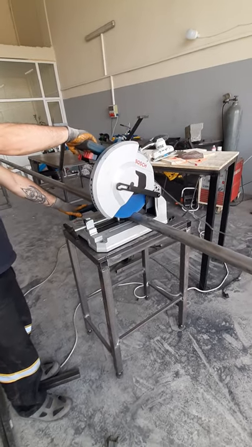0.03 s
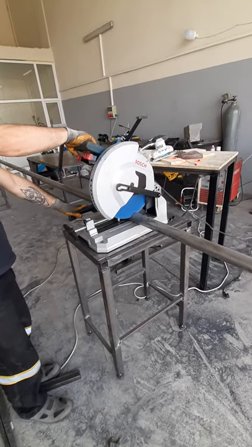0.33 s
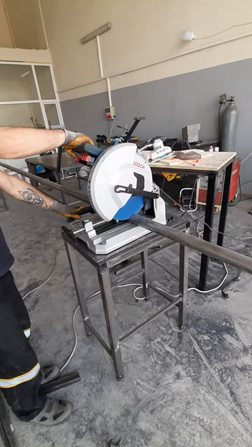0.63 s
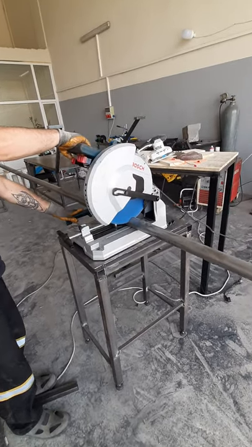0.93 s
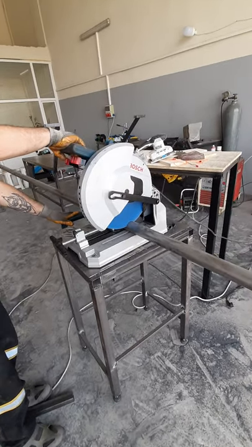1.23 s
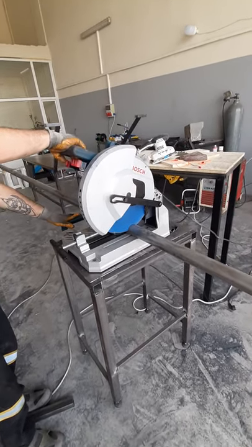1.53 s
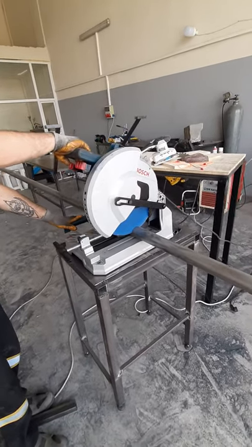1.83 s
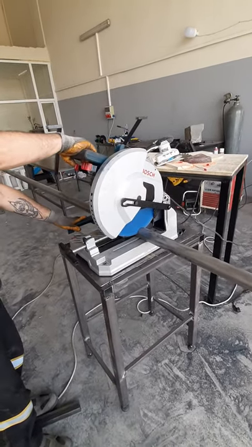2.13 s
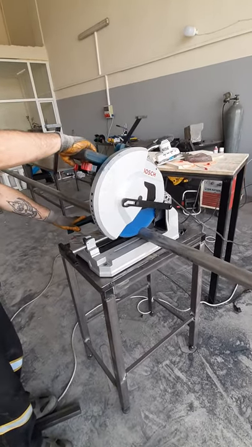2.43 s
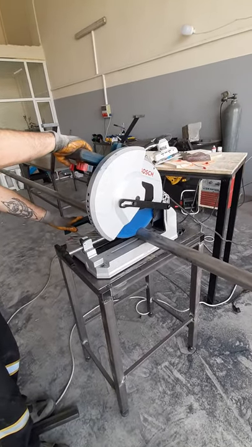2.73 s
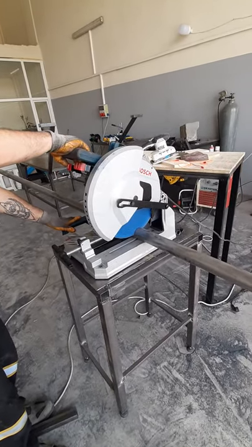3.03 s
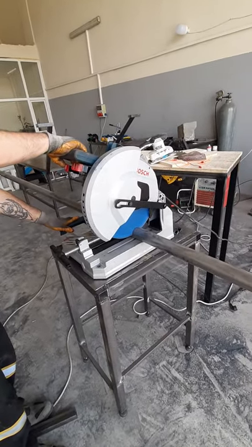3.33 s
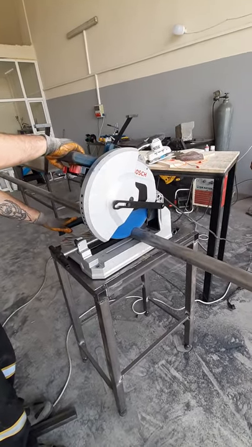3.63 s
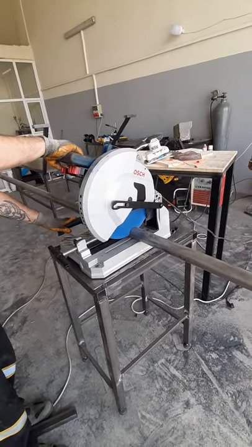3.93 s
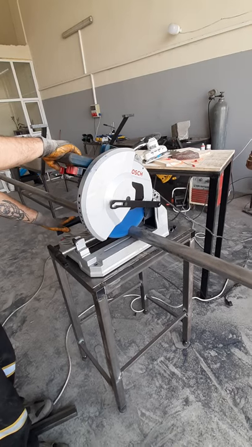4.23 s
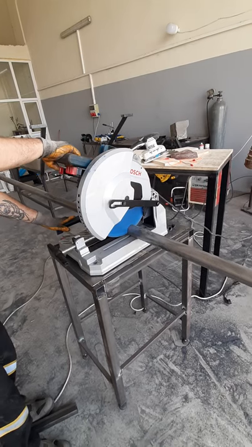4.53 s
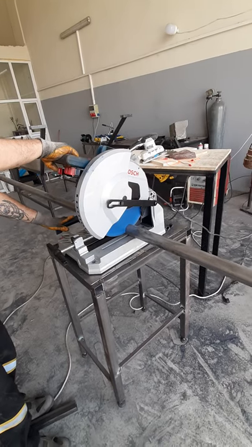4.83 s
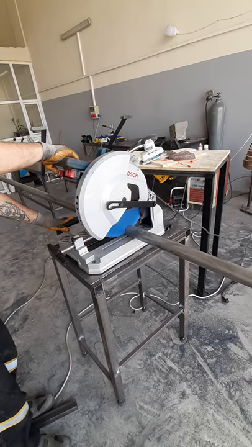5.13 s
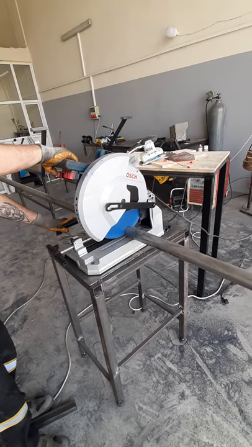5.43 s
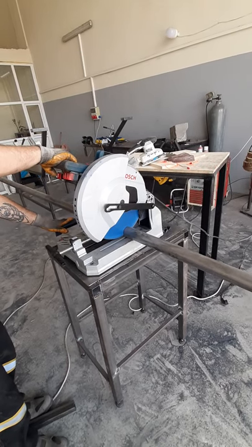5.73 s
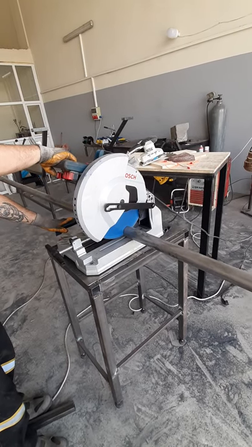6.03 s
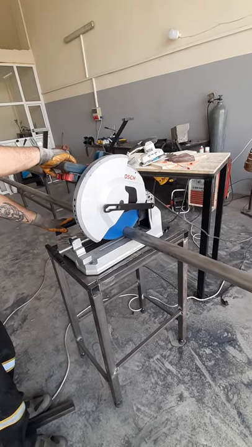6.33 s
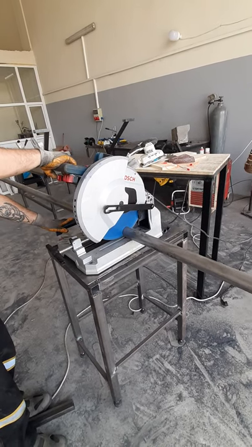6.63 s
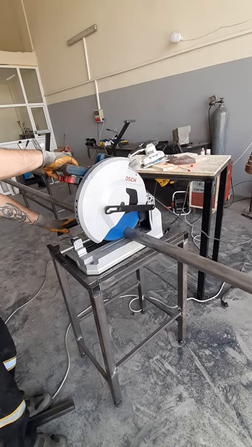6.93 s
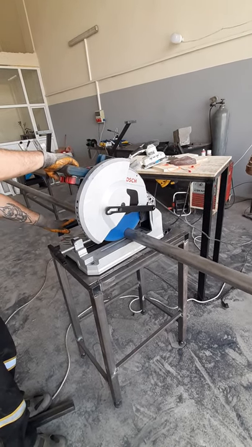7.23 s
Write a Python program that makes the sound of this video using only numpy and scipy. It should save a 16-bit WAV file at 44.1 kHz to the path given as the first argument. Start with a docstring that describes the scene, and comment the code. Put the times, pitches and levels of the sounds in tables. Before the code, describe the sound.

Close by in a workshop, a chop saw works through a steel pipe in seven pushes, a second or two apart. Each brings a harsh rasp, high shrieks and a spatter of chips ticking against the left side of the microphone. The motor sags a little under load and recovers as the pipe rings on. Air rushes from the motor throughout, and the last push is only just beginning at the end.

```python
"""A chop saw is already biting into a steel pipe in a hard-walled workshop, its cooling air roaring.
The push slows the motor; the 60 teeth whine, squeal and shriek, scrape the steel and set the pipe ringing.
Chips pelt the left microphone of a phone close by; the right one faces away and hears less treble.
Then the hand eases off, the blade speeds up and only brushes the pipe. Six more pushes follow, about
one to two seconds apart, and the last has only just begun when the sound ends."""
import sys
import numpy as np
from scipy import signal
from scipy.fft import rfft, irfft, next_fast_len
from scipy.io import wavfile

SR = 44100
rng = np.random.default_rng(int(sys.argv[2]) if len(sys.argv) > 2 else 0)


def waveform_to_disk(signal):
    """Save audio, clipped to [-1, 1], as 16-bit WAV at the path in sys.argv[1]."""
    frames = np.transpose(np.atleast_2d(signal))
    scaled = np.clip(frames, -1, 1) * 32767
    samples = np.round(scaled).astype(np.int16)
    wavfile.write(sys.argv[1], SR, samples)


N = 320607
T = np.arange(N) / SR
SIZE = next_fast_len(N + SR)  # a spare second leaves room for echoes
HZ = np.maximum(np.arange(SIZE // 2 + 1) * SR / SIZE, 1)

TEETH, FREE_HZ = 60, 1534.6  # with no load, FREE_HZ teeth pass each second
LEAN_S, EASE_S = .209, .186  # time for the hand to lean on the handle and to ease off

# Pushes into the pipe. Each row: start, length and the teeth's slide-out time in seconds, the drop in Hz
# that the tooth rate heads for, then relative levels in dB of first bite, scrape, chips, whine, squeal.
PUSHES = [(-0.05, 0.69, .45, 32.4, -10, 1.5, -1.5, -39.5, -37.5),
          (1.019, 0.76, 0.28, 35.05, 10.5, 4, 0, -33.5, -36.5),
          (2.13, 0.72, 0.38, 36, 11, 4, 1.5, -35, -36),
          (3.136, 1.38, 0.25, 31.66, 8.5, 4.5, -0.5, -34.5, -33.5),
          (4.914, .73, 0.32, 35.14, 10, 4.5, -1, -35, -35),
          (6.079, 0.63, 0.53, 50.54, 3, 4, -0.5, -35.5, -36),
          (7.112, .4, 0.26, 28, 5.5, 4.5, -21, -38, -40)]
# Tone colour of the cooling air. Each row: frequency in Hz, relative level in dB.
AIR_SPECTRUM = [(40, -105), (100, -82.5), (200, -66.5), (400, -63.5), (540, -57), (675, -50.5),
                (800, -61.5), (1100, -55), (1350, -58), (2100, -59), (3900, -80), (7600, -60), (9600, -93),
                (15000, -86)]
# The teeth's three sets of tones; half multiples come from alternating teeth.
# Each row: multiple of the tooth rate, relative level in dB, roughness, depth of the throb.
WHINE_TONES = [(1, 3.5, 0.86, 0.45), (2, -3, 0.8, 0.43)]
SQUEAL_TONES = [(4, 8, 0.36, 0.055), (4.5, 1.5, 0.87, 0.27), (8, -11, 0.54, 0.34)]
ZING_TONES = [(3, 6, 0.66, 0.34), (3.5, 0, 0.58, 0.5), (5, 7.5, 6.1, 0.22), (6, 8, 9.9, 0.23),
              (7, 3.5, 3.1, 0.89), (9, -10, 0.74, 0.71), (9.5, -2, .9, .4), (10, -9, .9, .4)]
# Moments when the blade catches and shrieks.
# Each row: start in seconds, length in seconds, multiple of the tooth rate, relative level in dB, roughness.
SHRIEKS = [(0, 0.75, 2, -25, 0.77), (0, 0.36, 5, -22.5, 0.77), (.377, .35, 6, -24, 0.52),
           (.42, 0.13, 1, -29, .5), (1.033, 0.4, 5, -29, .6), (1.028, 0.41, 6, -28, 0.2),
           (1.421, .28, 4, -24.5, 0.51), (1.593, 0.25, 6, -22, .6), (1.73, 0.21, 2, -24.5, 0.3),
           (2.127, 0.39, 6, -22, 0.68), (2.13, 0.18, 7, -25, 0.66), (3.138, 0.34, 7, -21, .4),
           (3.14, .2, 10, -29, .6), (3.53, 0.99, 4, -21, 0.22), (3.544, 1.2, 8, -30, .25),
           (4.327, 0.3, 4, -24.5, 0.23), (4.4, .2, 6, -22, 0.74), (4.449, 0.24, 5, -25, .6),
           (4.932, 0.39, 1, -32, 0.54), (5.584, 0.22, 4, -27, 0.44), (6.086, .25, 5, -23, .6),
           (6.11, 1.3, 2, -32, 0.63), (6.379, 0.13, 4, -25, 1.04), (6.553, 0.18, 6, -23, 0.55),
           (7.13, .3, 2, -27.5, 0.88)]
# Tone colours of the scrape and of the pipe's body. Each row: frequency in Hz, relative level in dB.
SCRAPE_SPECTRUM = [(80, -110), (500, -78.5), (2500, -74), (3900, -62), (4400, -59.5), (5400, -59),
                   (6400, -62), (7600, -60), (9600, -65), (11800, -61.5), (13500, -64), (14500, -66.5),
                   (16000, -69)]
BODY_SPECTRUM = [(150, -110), (700, -75), (1600, -72), (2100, -56), (2700, -56), (3400, -58.5),
                 (4200, -66.5), (8000, -104)]
# Notes the pipe rings at, low to high. Each row: pitch in Hz, width in Hz, relative level in dB.
PIPE_NOTES = [(2035, 25, -3), (2547, 16, -4), (2846, 18, -1), (3332, 16, -5), (3693, 22, -6),
              (4290, 40, -4), (4339, 30, 1), (4460, 50, -4), (4834, 14, 3), (5050, 40, -3), (5140, 30, -4),
              (5260, 22, 0), (5335, 30, -4), (5830, 40, -6), (6767, 20, -5), (6865, 14, -1), (7050, 40, -5),
              (7350, 40, -6), (7700, 70, -4), (9970, 30, -8), (13258, 27, -5)]
# Rise and fall of the pipe's lowest, purest note. Each row: time in seconds, relative level in dB.
RING_LEVELS = [(0.0, -45), (0.24, -51), (0.36, -41), (0.91, -30.5), (1.07, -50), (1.48, -43), (2.75, -46),
               (2.85, -38), (3.73, -44), (5.24, -43), (5.3, -31), (5.63, -43), (5.97, -36), (6.32, -44),
               (7.05, -28), (7.27, -35)]
# Tone colour of the chips hitting the phone. Each row: frequency in Hz, relative level in dB.
CHIP_SPECTRUM = [(20, -76), (40, -58), (65, -49.5), (100, -51), (200, -53.5), (400, -56), (1000, -57.5),
                 (2500, -62.5), (6000, -71), (12000, -65), (16000, -60.5)]
# The blade's side rubs in the cut. Each row: start in seconds, length in seconds, relative level in dB.
RUBS = [(0.265, 0.16, 3), (.63, .16, 5), (2.923, .11, 3.5), (4.651, 0.1, 1), (6.375, 0.17, 2.5),
        (6.919, 0.11, -6)]
# What the right microphone hears. Each row: frequency in Hz, level in dB compared with the left one.
RIGHT_MIC = [(300, -1.5), (800, 0.5), (1130, -3.5), (1500, 1), (2600, 2.5), (3500, 1), (4350, -5.5),
             (5100, -2.5), (6100, -2.5), (7000, -16), (8400, -22), (9700, -14), (12000, -12), (13500, -5.5),
             (15000, -7)]


def undb(db):
    """Turn decibels into a number to multiply by."""
    return 10 ** (np.asarray(db) / 20)


def unit(x):
    """Scale a signal to an average power of 1."""
    return x / np.sqrt(np.mean(np.abs(x) ** 2))


def shape(x, gain):
    """Turn each frequency up or down by its own gain."""
    return irfft(rfft(x, SIZE) * gain, SIZE)[..., :N]


def response(points):
    """Join (Hz, dB) points into a gain for every frequency."""
    hz, db = np.transpose(points)
    return undb(np.interp(np.log(HZ), np.log(hz), db))


def colour(x, points):
    """Give white noise the tone colour listed in a table."""
    return shape(x, response(points)) * np.sqrt(SR / 2)


def wander(hz):
    """A smooth random wobble, up to about hz, for each microphone."""
    return unit(shape(rng.standard_normal((2, N)), 1 / (1 + (HZ / hz) ** 2)))


def stereo_noise(alike_hz=1100):
    """White noise at two microphones: alike in the bass, unrelated in the treble."""
    share = .8 / (1 + (HZ / alike_hz) ** 3)
    common = shape(rng.standard_normal(N), np.sqrt(share))
    return common + shape(rng.standard_normal((2, N)), np.sqrt(1 - share))


def echoes(x, fade_s, echo_db):
    """Add a dense tail that fades by 60 dB in fade_s, keeping about the same loudness."""
    t = T[:SR]
    tail = rng.standard_normal((2, SR)) * undb(-60 * t / fade_s) * (t > .005)
    tail = tail / np.sqrt(np.sum(tail ** 2) / 2)
    return (x + undb(echo_db) * shape(x, rfft(tail, SIZE))) / np.hypot(1, undb(echo_db))


def gate(age, length, rise_s, fall_s):
    """Rise from 0 to 1, hold until length is over, then fall back."""
    return np.clip(age / rise_s, 0, 1) * np.clip(1 - (age - length) / fall_s, 0, 1)


def push_gain(levels_db, rise_s, fall_s, entry_db, settle_s):
    """On each push a sound comes in entry_db away from its level, settles, and fades afterwards."""
    out, each = 0, np.ones(len(PUSHES))
    for (start, length, *_), db, fade_s in zip(PUSHES, levels_db * each, fall_s * each):
        age = np.maximum(T - start, 0)
        out = out + undb(db + entry_db * np.exp(-age / settle_s)) * gate(age, length, rise_s, fade_s)
    return out


def slowing(drops_hz, lag_s=.257):
    """How far the tooth rate drops, in Hz: each push brakes the heavy blade, which follows late."""
    braking = sum(hz * gate(T - start, length, LEAN_S, EASE_S)
                  for (start, length, *_), hz in zip(PUSHES, drops_hz))
    keep = np.exp(-1 / (lag_s * SR))
    return signal.lfilter([1 - keep], [1, -keep], braking)


def cooling_air(pressure, level_db=1, dip_db=-2.5):
    """Cooling air roars steadily; the phone turns it down a little during each loud push."""
    return undb(level_db + dip_db * pressure) * colour(stereo_noise(), AIR_SPECTRUM)


def tooth_tones(rows, turns, load, flutter_hz, blur_hz):
    """Under load the slightly off-centre blade swells its tones once a turn; uneven bites roughen them."""
    out = 0
    swing = load * np.cos(2 * np.pi * turns + 0.5 * wander(1.9)[0])
    for multiple, db, rough, throb in rows:
        width_hz = flutter_hz + blur_hz * multiple
        uneven = 1 + rough * (wander(width_hz) + 1j * wander(width_hz))
        tone = np.exp(1j * np.pi * round(2 * multiple) * TEETH * turns)
        out = out + undb(db) * unit(np.real((1 + throb * swing) * uneven * tone))
    return out


def singing_blade(turns, load, whine_db, squeal_db, slide_s, idle_whine_db=-39.5, idle_zing_db=-47.5):
    """Whine and zing are strongest as the teeth enter the steel; the squeal holds until they slide out."""
    whining = push_gain(whine_db, rise_s=0.064, fall_s=0.21, entry_db=7.5, settle_s=0.64)
    whining = np.hypot(whining, undb(idle_whine_db))
    squealing = push_gain(squeal_db, rise_s=.015, fall_s=slide_s, entry_db=-2, settle_s=0.24)
    zinging = push_gain(levels_db=-37.5, rise_s=0.0096, fall_s=slide_s, entry_db=3, settle_s=0.63)
    zinging = np.hypot(zinging, undb(idle_zing_db))
    whine = whining * tooth_tones(WHINE_TONES, turns, load, flutter_hz=22, blur_hz=13)
    squeal = squealing * tooth_tones(SQUEAL_TONES, turns, load, flutter_hz=10, blur_hz=4.5)
    zing = zinging * tooth_tones(ZING_TONES, turns, load, flutter_hz=21, blur_hz=3.5)
    # concrete walls and floor make the tones linger
    return echoes(whine + squeal + zing + shrieks(turns), fade_s=.6, echo_db=-13)


def shrieks(turns, flutter_hz=35, rise_s=.012):
    """The blade rings along with one tooth tone: a shriek that starts at once and dies away."""
    flutter = wander(flutter_hz) + 1j * wander(flutter_hz)
    out = np.zeros((2, N))
    for start, length, multiple, db, rough in SHRIEKS:
        on = (T >= start) & (T < start + length)
        age = T[on] - start
        swell = np.minimum(age / rise_s, 1) * np.sqrt(2 - 2 * (age / length) ** 2)
        tone = np.exp(2j * np.pi * round(multiple) * TEETH * turns[on])
        out[:, on] += undb(db) * swell * np.real(unit(1 + rough * flutter[:, on]) * tone)
    return out


def knock(turns, fade_turns, slop_turns=.06):
    """The tallest tooth lands once a turn: a sudden rise that fades over part of the turn."""
    return np.exp(-((turns + slop_turns * wander(12)[0]) % 1) / fade_turns)


def bites(levels_db, fade_s=0.016, rebound_s=0.037, rebound_db=-5):
    """Strength of the sudden rasp as the teeth catch, skip and catch again about a turn later."""
    rasp = lambda age: (age >= 0) * np.exp(-np.abs(age) / fade_s)
    return sum(undb(db) * (rasp(T - start) + undb(rebound_db) * rasp(T - start - rebound_s))
               for (start, *_), db in zip(PUSHES, levels_db))


def cutting(turns, scraping, ringing, low_db=-31, high_db=-26, throb=0.91, tooth_depth=0.42):
    """Teeth tear the steel in bursts, harder once a turn, and the pipe rings with its own notes."""
    judder_db = 0.88 * wander(22)[0]
    force = unit((1 + throb * knock(turns, fade_turns=0.55)) * undb(judder_db))
    bursts = unit(force * (1 + tooth_depth * np.cos(2 * np.pi * TEETH * turns)))
    scrape = colour(bursts * stereo_noise(), SCRAPE_SPECTRUM) * scraping
    body = colour(stereo_noise(), BODY_SPECTRUM) * ringing
    # the low notes swell with the pipe's body, the high ones also with the scraping
    low = pipe_notes(stereo_noise(), PIPE_NOTES[:5]) * undb(low_db)
    high = pipe_notes(bursts * stereo_noise(), PIPE_NOTES[5:]) * scraping * undb(high_db)
    return echoes(scrape + body, fade_s=0.1, echo_db=-4) + ringing * (low + high)


def pipe_notes(shaking, rows):
    """The pipe picks its own notes out of whatever shakes it."""
    peaks = sum(undb(db) / (1 + 1j * (HZ ** 2 - hz ** 2) / (HZ * width)) for hz, width, db in rows)
    return unit(shape(shaking, peaks))


def pure_ring(pitch_hz=1008, boost_db=1, waver=0.5, drift=0.24):
    """The pipe holds one note that swells and fades, whatever the speed of the blade."""
    level_db = np.interp(T, *np.transpose(RING_LEVELS)) + boost_db
    tone = (1 + waver * wander(5)) * np.cos(2 * np.pi * pitch_hz * T + drift * wander(2.3))
    return undb(level_db) * unit(tone)


def chips(turns, stream, most_per_second=2600, spread_db=4, gust=3.2, right_db=-26):
    """Steel chips spray the phone once a turn, mostly on the left: each is a tick with a dull thump."""
    spray = unit(1 + gust * knock(turns, fade_turns=0.16))
    # a thin stream has fewer chips, a thick one heavier chips
    density = np.minimum(stream, 1)
    hit = rng.random((2, N)) < most_per_second / SR * density
    size = spray * undb(spread_db * np.clip(rng.standard_normal((2, N)), -2, 2))
    ticks = unit(hit * size * rng.choice([-1, 1], (2, N))) * stream / np.sqrt(density)
    return colour(ticks, CHIP_SPECTRUM) * undb([[0], [right_db]])


def rubs(rise_s=0.019, fall_s=0.061):
    """Strength of the short rasps as the side of the blade rubs in the cut."""
    return sum(undb(db) * gate(T - start, length - fall_s, rise_s, fall_s) for start, length, db in RUBS)


def scene(full_drop_hz=30, brush_db=-4, stray_chips_db=-21.5, bite_chips_db=-4):
    """The pushes slow the blade, make it sing, scrape the pipe and throw chips."""
    _, _, slide_s, drops_hz, bite_db, scrape_db, chip_db, whine_db, squeal_db = np.transpose(PUSHES)
    drop_hz = slowing(drops_hz)
    turns = np.cumsum(FREE_HZ - drop_hz) / TEETH / SR
    load = np.clip(drop_hz / full_drop_hz, 0, 1)
    pressure = sum(gate(T - start, length, LEAN_S, EASE_S) for start, length, *_ in PUSHES)
    # between pushes the blade still brushes the pipe and throws stray chips
    tearing = push_gain(scrape_db, rise_s=0.075, fall_s=slide_s, entry_db=-11, settle_s=0.035)
    scraping = np.sqrt(tearing ** 2 + bites(bite_db) ** 2 + rubs() ** 2 + undb(brush_db) ** 2)
    stream = push_gain(chip_db, rise_s=0.046, fall_s=0.048, entry_db=-13.5, settle_s=.1)
    stream = stream + undb(stray_chips_db) + bites(chip_db + bite_chips_db)
    # the pipe rings louder as the cut drags on the blade, but is muffled while the blade presses on it
    ringing = undb(-5 + 0.2048 * drop_hz - 2.5 * pressure)
    saw = singing_blade(turns, load, whine_db, squeal_db, slide_s) + cooling_air(pressure)
    return saw + cutting(turns, scraping, ringing) + pure_ring() + chips(turns, stream)


def record(dry, notch_hz=8650, notch_width_hz=260, notch_db=-11, lag_samples=5, top_hz=15850):
    """Both microphones dull a narrow band of treble; the right one is shaded and hears a little later."""
    notch = undb(notch_db / (1 + ((HZ - notch_hz) / notch_width_hz) ** 2))
    right = response(RIGHT_MIC) * np.exp(-2j * np.pi * HZ * lag_samples / SR)
    heard = np.clip(shape(dry, np.array([notch, notch * right])), -1, 1)
    treble_cut = signal.ellip(12, .1, 80, top_hz, fs=SR, output="sos")
    return signal.sosfilt(treble_cut, heard)


dry = scene()
out = record(dry)
waveform_to_disk(out)
```